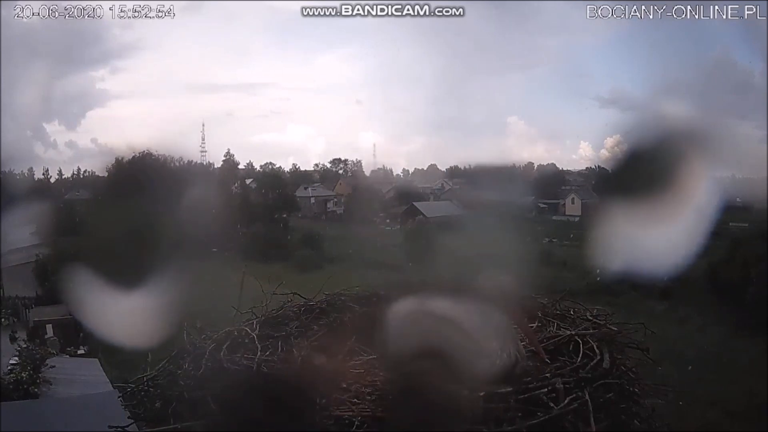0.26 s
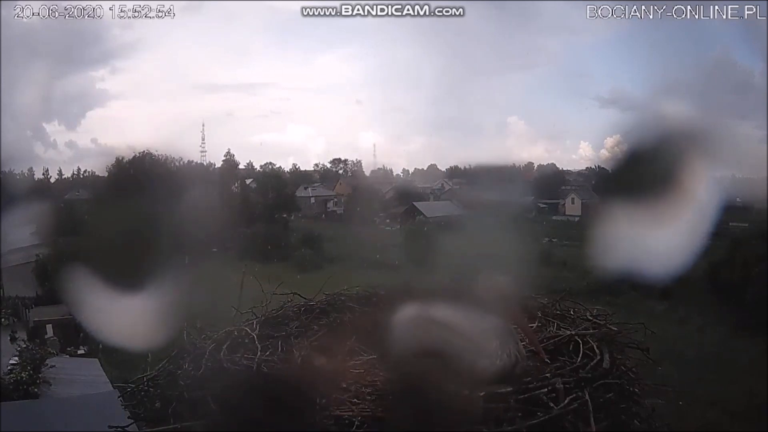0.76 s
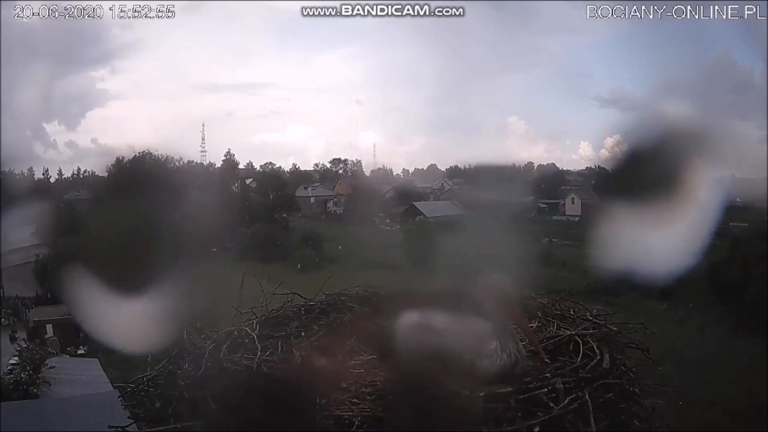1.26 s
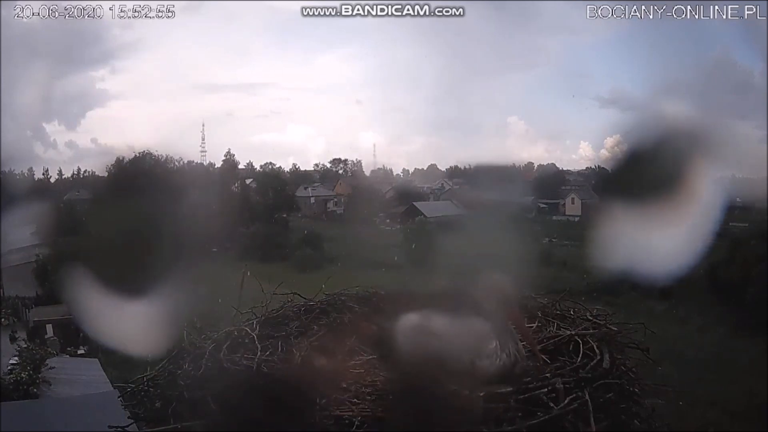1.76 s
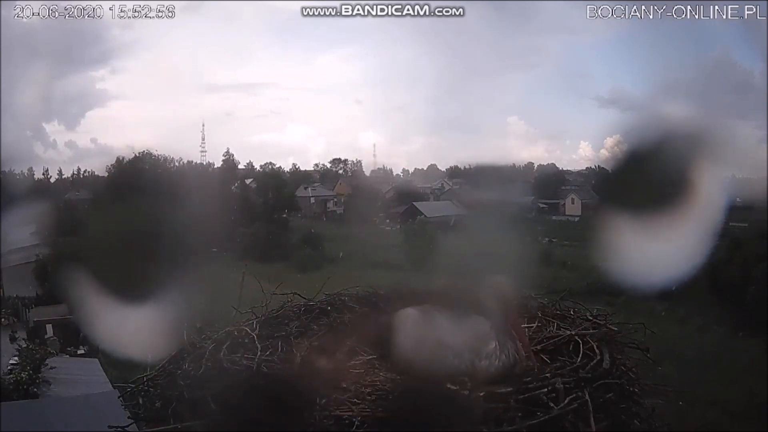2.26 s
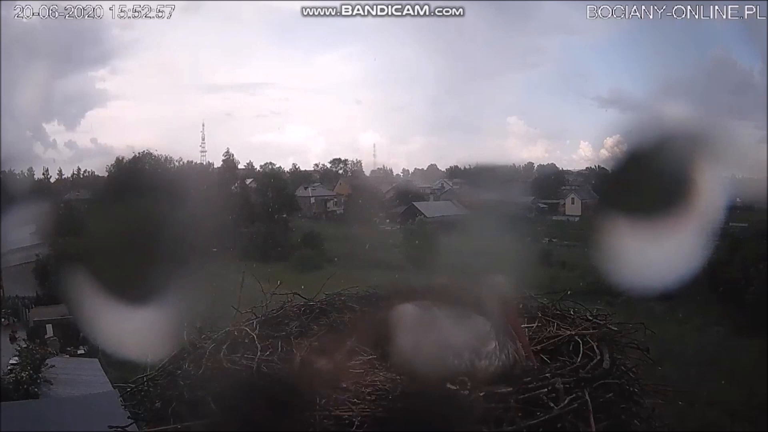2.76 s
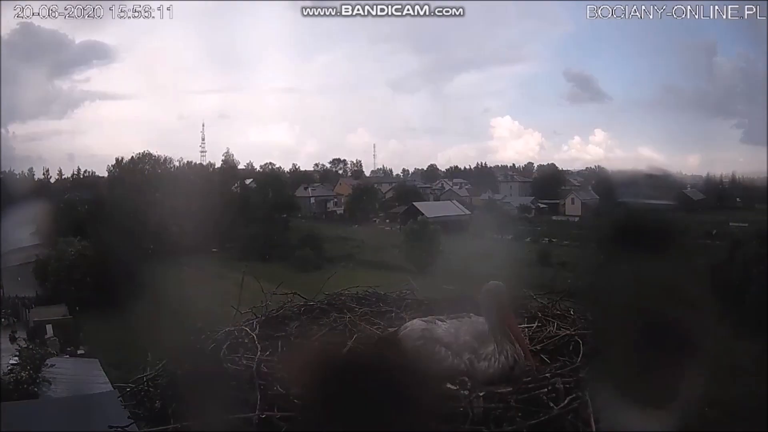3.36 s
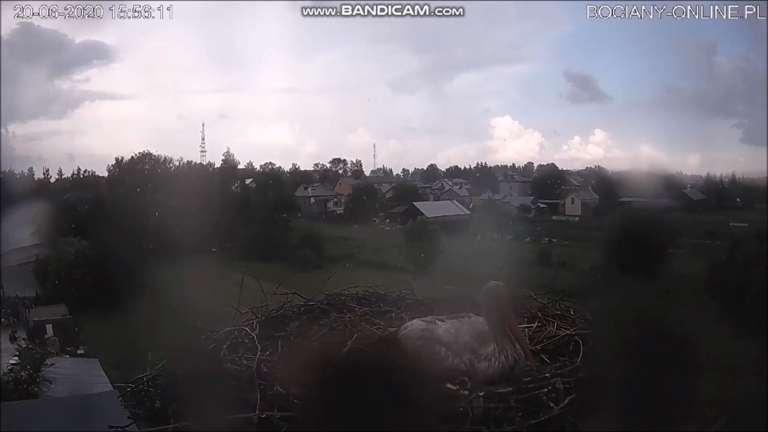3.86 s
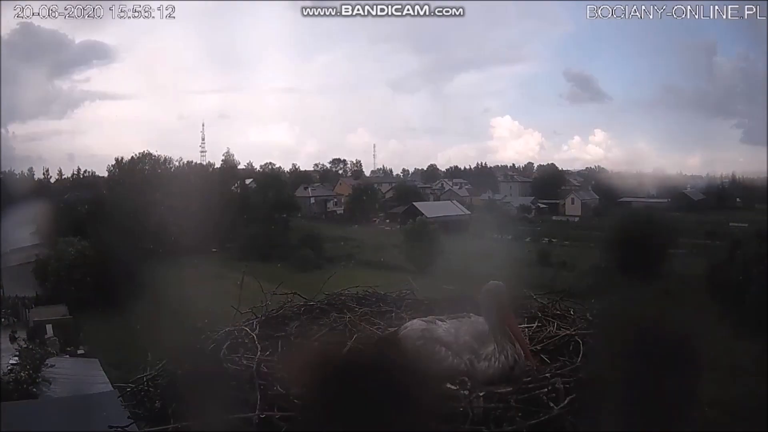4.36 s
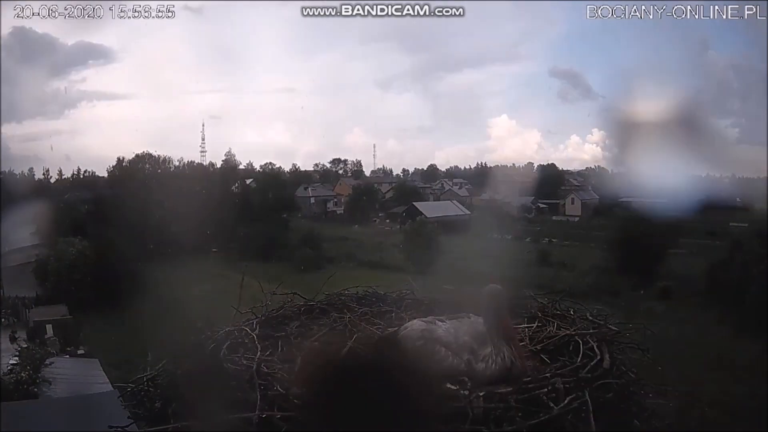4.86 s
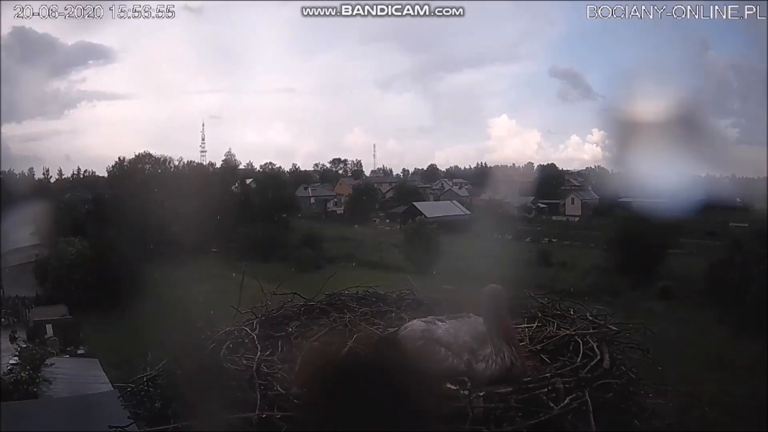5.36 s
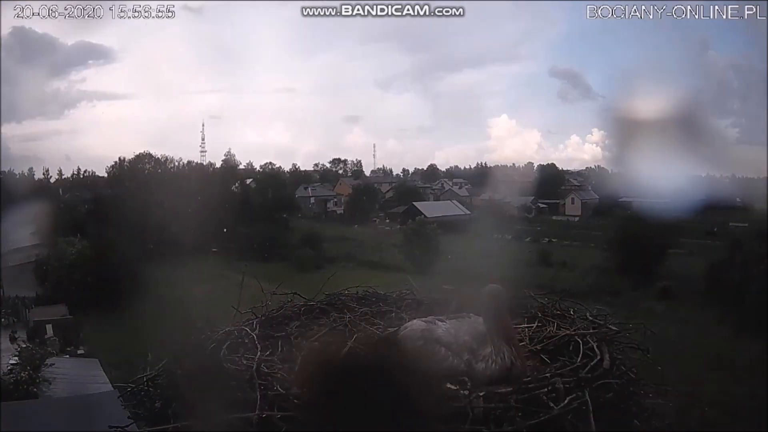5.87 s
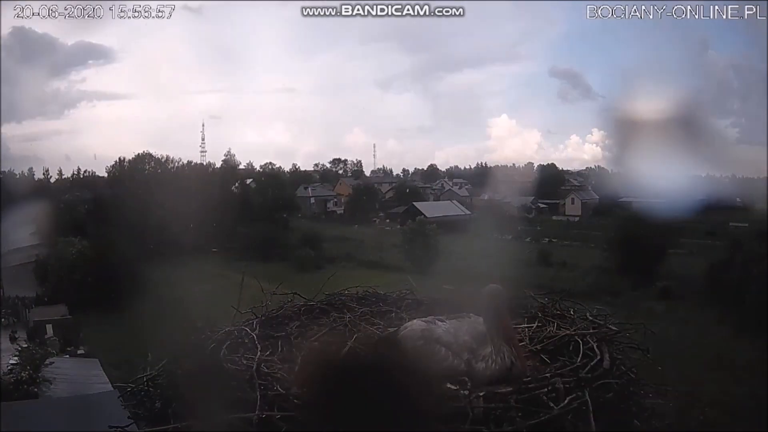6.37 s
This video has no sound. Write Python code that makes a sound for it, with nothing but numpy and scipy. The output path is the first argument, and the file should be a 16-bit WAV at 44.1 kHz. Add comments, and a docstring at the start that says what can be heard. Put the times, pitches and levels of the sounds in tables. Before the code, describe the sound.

Drops tap near the microphone as steady rain and far rumbles cut out briefly, returning softer before nearby thunder cracks sharply.

```python
"""Gardens in a thunderstorm, heard in mono from inside the housing of an outdoor camera. Heavy rain hisses on
leaves and roofs over far thunder, then the sound drops out for a moment. Lighter rain follows, and a close peal
cracks twice and rolls away: shock waves from a long, crooked lightning channel. Single drops tap on the housing
and tick on the twigs around it."""
import sys
import numpy as np
from scipy import signal
from scipy.fft import rfft, irfft
from scipy.io import wavfile

SR = 44100
rng = np.random.default_rng(int(sys.argv[2]) if len(sys.argv) > 2 else 0)


def dump_mix(stems):
    """Bounce the given channels to the path in sys.argv[1] as a 16-bit WAV at rate SR."""
    frames = np.atleast_2d(stems).T  # one column per channel
    limited = np.clip(frames, -1, 1)  # hard clip at full scale
    pcm = np.round(limited * 32767).astype(np.int16)
    wavfile.write(sys.argv[1], SR, pcm)


N = 291501
TIME = np.arange(N) / SR
HEAVY_RAIN_END_S, LIGHT_RAIN_START_S, PEAL_START_S = 3.134, 3.2, 4.867

# The tone of close thunder, for its roll and its claps. Each row: frequency in Hz, gain in dB.
PEAL_COLOUR = [(30, -83), (70, -36), (110, -17), (190, -1.5), (340, -1), (650, -4.5), (900, -4.5),
               (1250, -1), (1700, -5.5), (2400, -13.5), (3200, -21), (5000, -30), (9000, -39)]


def peal(bed_db=-37, fade_db_per_s=3.5, rasp_db=7.0, rasp_s=0.21):
    """Close thunder starts at once and dies away; its first waves, from the nearest channel, rasp."""
    # Swells of the close roll. Each row: crest in seconds, level in dB, fade time in seconds.
    swells = [(5.03, -33.5, 0.023), (5.18, -30, 0.088), (5.355, -34.5, 0.14), (5.65, -38.5, 0.11),
              (5.965, -36, 0.037), (6.24, -41, 0.18)]
    body = roll(PEAL_COLOUR, grain_db=-1.5, throb_db=-0.5)
    age = np.maximum(TIME - PEAL_START_S, 0)
    rasping = boost(body, hz=2350, width_hz=1200, db=rasp_db * np.exp(-age / rasp_s))
    loudness = surges(swells, bed_db - fade_db_per_s * age, rise_share=1)
    return (TIME >= PEAL_START_S) * loudness * rasping


def claps(steep_hz=4000, snap_db=-2.5, snap_share=0.3, crackle_db=-20, crackle_s=0.01):
    """Stretches of lightning that lie side-on arrive all at once: a sharp front with a short wake."""
    # Shock fronts that stand out of the roll. Each row: start in seconds, level in dB,
    # fade time in seconds, low-pass cutoff in Hz, thump boost in dB.
    fronts = [(0.152, -28, 0.0032, 1400, 10), (0.192, -33, 0.007, 496, 5), (1.618, -34, 0.016, 650, 6),
              (4.263, -47.5, 0.045, 900, -4), (4.425, -44.5, 0.0099, 500, 13),
              (4.869, -31, 0.0082, 3000, 5), (4.9, -37, 0.016, 500, 10), (5.063, -20.5, 0.016, 6000, 5),
              (5.068, -20, 0.0033, 450, 5), (5.0715, -28, 0.0069, 4500, 6), (5.079, -23.5, 0.01, 5000, 6),
              (5.086, -35, 0.0096, 4500, -2), (5.1015, -31.5, 0.014, 4500, 5),
              (5.124, -27, 0.016, 2400, -2), (5.131, -25.5, 0.024, 5000, -2),
              (5.1385, -24, 0.0037, 5000, -1), (5.143, -23, 0.0046, 5000, 3), (5.1495, -18, 0.014, 5100, 0),
              (5.159, -23, 0.014, 4500, 12), (5.175, -27, 0.0068, 4500, 8), (5.243, -33, 0.0088, 500, 6),
              (5.326, -31, 0.029, 500, 10), (5.37, -32, 0.012, 1900, 0), (5.551, -32.5, 0.02, 550, 10),
              (5.582, -34.5, 0.037, 2400, -19), (5.64, -27.5, 0.0064, 2200, -9),
              (5.66, -36, 0.013, 2400, -16), (5.682, -30.5, 0.018, 1900, -3), (5.757, -39, 0.012, 1500, -2),
              (5.893, -37, 0.008, 2400, -11), (6.056, -27, 0.0034, 2200, -14), (6.079, -34, 0.008, 600, -4),
              (6.196, -28.5, 0.0085, 1800, 1), (6.243, -34, 0.016, 550, 14), (6.272, -26, 0.01, 1800, 6),
              (6.304, -36.5, 0.0095, 500, 3), (6.590, -29.5, 0.017, 1800, 2.5)]
    # The bright tone of a snap. Each row: frequency in Hz, gain in dB.
    snap_colour = [(100, -18), (500, 17), (2000, 2), (4000, -5.5), (6500, -4), (10000, -8.5), (16000, -15)]
    out, wakes = np.zeros(N), np.zeros(N)
    for start, db, fade_s, top_hz, thump_db in fronts:
        front = shock_burst(PEAL_COLOUR, fade_s, lead_db=-7)
        thumping = boost(front, hz=310, width_hz=280, db=thump_db)
        add(out, start, undb(db) * np.std(front) * unit(cut(thumping, top_hz, "low")))
        if top_hz > steep_hz:  # the steepest fronts snap through the treble, and their wake crackles
            snap = shock_burst(snap_colour, snap_share * fade_s, lead_db=-8)
            add(out, start, undb(db + snap_db) * snap)
            add(wakes, start, undb(db) * np.exp(-TIME / crackle_s))
    crackle = unit(colour(impacts(rate=600, spread_db=3, limit_db=6), snap_colour))
    return out + undb(crackle_db) * wakes * crackle


def shock_burst(tone, fade_s, lead_db, size=8192):
    """One leading shock, then a fading bundle of smaller ones."""
    envelope = np.exp(-np.arange(size) / SR / fade_s)
    wake = unit(rng.standard_normal(size) * envelope)
    lead = undb(lead_db) * unit(signal.unit_impulse(size))
    return unit(colour(lead + wake, tone)) * np.sqrt(np.mean(envelope ** 2))


def roll(tone, grain_db, throb_db):
    """Scattered shock waves from a long crooked channel, dulled by the air, arrive in clumps."""
    shocks = rng.standard_normal(N) + undb(grain_db) * impacts(rate=500, spread_db=-3.0, limit_db=1.5)
    return unit(colour(shocks, tone)) * undb(throb_db * drift(35))


def surges(swells, bed_db, rise_share):
    """Loudness of a roll: each bend of the channel sends a swell, whose power adds to a bed."""
    power = undb(bed_db) ** 2
    for crest_s, db, fade_s in swells:
        rise_s = rise_share * fade_s
        from_crest = np.maximum((TIME - crest_s) / fade_s, (crest_s - TIME) / rise_s)
        power = power + (undb(db) * np.exp(-from_crest)) ** 2
    return np.sqrt(power)


def rain(patter_db=-6, spray_db=-19, flutter_db=1.0, sizzle_sway_db=2):
    """Countless far drops merge into hiss; nearer ones patter and sizzle, the nearest spray ticks."""
    # The tone of rain on leaves and roofs. Each row: frequency in Hz, gain in dB.
    wash_colour = [(100, -31.5), (250, -19), (500, -11.5), (850, -9), (1150, 0), (1600, 0.5), (2000, -2.5),
                   (3000, -5), (4500, -6.5), (6000, -11), (7100, -14), (9500, -14.5), (11500, -21.5),
                   (16000, -31)]
    # How the sizzle rides on the wash. Each row: time in seconds, relative level in dB.
    sizzle_curve = [(0, -12), (1.66, -14.5), (1.74, -5.5), (1.86, -12), (1.98, -12), (3.13, -13.5),
                    (3.6, -17), (6.6, -14.5)]
    # Each kind of twig and leaf has its own tick. Each row: pitch in Hz, level in dB.
    leaves = [(4700, 1), (5900, -0.5), (7800, 3.5), (9500, 1.5), (12000, -15)]
    hiss = rng.standard_normal(N) * undb(flutter_db * drift(9.2))
    patter = impacts(rate=1400, spread_db=6.5, limit_db=12.5)
    wash = unit(colour(hiss + undb(patter_db) * patter, wash_colour))
    pings = ring_twice(impacts(rate=1200, spread_db=7.0, limit_db=16.5), hz=3560, width_hz=600)
    sizzle_db = np.interp(TIME, *np.transpose(sizzle_curve)) + sizzle_sway_db * drift(7.9)
    spray = np.zeros(N)
    for hz, db in leaves:
        hits = impacts(rate=22, spread_db=3.5, limit_db=6.5)
        spray += undb(db) * ring_twice(hits, hz, width_hz=2200)
    return rain_strength() * (wash + undb(sizzle_db) * unit(pings) + undb(spray_db) * unit(spray))


def rain_strength(heavy_db=-42, flurry_db=0.5, flurry_s=0.99, light_db=-50, pickup_db_per_s=0.54):
    """The heavy rain settles after a slight flurry; the lighter rain slowly picks up."""
    heavy = heavy_db + flurry_db * np.exp(-TIME / flurry_s)
    light = light_db + pickup_db_per_s * (TIME - LIGHT_RAIN_START_S)
    return undb(np.where(TIME < LIGHT_RAIN_START_S, heavy, light))


def housing_drops(tick_s=0.00072, click_db=-14):
    """A drop ticks on the housing, then its body lands with a lower slap and a hollow plop."""
    # Drops on the housing. Each row: start in seconds, tick level in dB, tick pitch in Hz,
    # slap delay in seconds, slap level in dB, slap pitch in Hz, slap fade time in seconds,
    # low-pass cutoff in Hz, plop level in dB.
    drops = [(0.2323, -10.5, 6830, 0.0003, -18, 2340, 0.0014, 15000, -48),
             (0.5651, -29, 5200, 0.0021, -22.5, 2000, 0.0031, 13000, -34),
             (1.298, -26, 5400, 0.0014, -25.5, 1450, 0.001, 11000, -54),
             (2.7701, -18, 3880, 0.0026, -18, 1400, 0.00068, 14500, -45),
             (2.9211, -25, 2400, 0.0031, -21.5, 1450, 0.0016, 13000, -25),
             (3.3332, -27.5, 3400, 0.0002, -39, 2270, 0.0008, 7000, -50),
             (5.9762, -30, 4300, 0.00063, -30, 1200, 0.0016, 8000, -36),
             (6.1892, -31, 5000, 0.0005, -33.5, 1150, 0.0016, 13000, -40)]
    # Resonances of the housing wall. Each row: pitch in Hz, bandwidth in Hz, level in dB.
    wall_modes = [(327, 92, -8), (600, 71, -7), (1220, 540, 2.5), (2770, 170, 0), (4100, 1200, -5),
                  (6270, 390, -5.5), (9910, 120, 5), (11800, 600, -12), (14200, 800, -9)]

    def strike(fade_s, hz, top_hz, width_share, splash_db, wall_db):
        """A push rings the spot that it hits and the wall around it."""
        push = cut(drop_push(fade_s, splash_db), top_hz, "low")
        spot = ring(push, hz, width_share * hz)
        wall = ring_modes(push, wall_modes)
        return with_tone_energy(spot + undb(wall_db) * wall + undb(click_db) * push, fade_s)

    hollow = ring_twice(signal.unit_impulse(1024), hz=600, width_hz=320)
    plop = with_tone_energy(hollow, fade_s=0.0015)
    out = np.zeros(N)
    for start, tick_db, tick_hz, lag_s, slap_db, slap_hz, slap_s, top_hz, plop_db in drops:
        tick = strike(tick_s, tick_hz, top_hz, width_share=0.29, splash_db=-13, wall_db=-4)
        slap = strike(slap_s, slap_hz, top_hz, width_share=0.31, splash_db=-11, wall_db=-3)
        add(out, start, undb(tick_db) * tick)
        add(out, start + lag_s, undb(slap_db) * slap + undb(plop_db) * plop)
    return cut(out, 180, "high")


def twig_ticks(fade_s=0.0011, splash_db=-14, click_db=-23):
    """A drop on a twig gives one tick that rings very briefly at the twig's own pitch."""
    # Drops on nearby twigs. Each row: start in seconds, level in dB, pitch in Hz, bandwidth in Hz.
    ticks = [(0.0294, -35, 9000, 5000), (0.047, -34, 7400, 1000), (0.0888, -29, 7500, 5000),
             (0.112, -29, 5130, 1000), (0.2188, -27, 7500, 6000), (0.277, -35, 5700, 900),
             (0.683, -46, 12000, 5000), (0.789, -38, 10000, 5000), (0.845, -29, 4930, 1800),
             (0.961, -33.5, 8500, 5000), (1.03, -35, 6500, 2000), (1.137, -36, 9500, 2500),
             (1.207, -34, 6000, 2500), (1.344, -33, 7000, 3000), (1.603, -31.5, 6000, 3000),
             (2.176, -37, 9500, 2000), (2.248, -36, 7500, 4000), (2.295, -35, 9000, 5000),
             (2.359, -36, 6000, 2000), (2.4372, -29, 5170, 4000), (2.52, -34, 5800, 3000),
             (2.739, -36, 7000, 2500), (2.819, -50, 5500, 2500), (3.083, -34, 7950, 6000),
             (3.107, -32.5, 7500, 3000), (3.494, -42, 12900, 2980), (3.831, -39, 5200, 2500),
             (4.02, -48, 10000, 5000), (4.151, -43, 6460, 1800), (4.23, -49, 14100, 2500),
             (4.332, -50, 11200, 3000), (4.5445, -43, 7000, 3000), (4.595, -35.5, 5600, 3000),
             (4.686, -35.5, 8000, 4000), (4.751, -38, 7500, 3500), (5.329, -43, 7000, 3500),
             (5.611, -41, 7500, 3000), (5.667, -41, 12500, 2500), (5.896, -36, 8700, 2500),
             (6.039, -49, 13000, 3000), (6.189, -24.5, 4700, 2400), (6.346, -32.5, 5730, 1000),
             (6.456, -38, 9000, 1600)]
    out = np.zeros(N)
    for start, db, hz, width_hz in ticks:
        push = drop_push(fade_s, splash_db)
        tick = ring_twice(push, hz, width_hz) + undb(click_db) * push
        add(out, start, undb(db) * with_tone_energy(tick, fade_s))
    return out


def far_thunder(first_top_hz=1500, second_top_hz=500):
    """Two distant rolls over a faint steady rumble; the second has come further, so it is duller."""
    # The dark tone of far thunder. Each row: frequency in Hz, gain in dB.
    far_colour = [(30, -35), (70, -38), (110, -12), (190, 1), (320, 0.5), (500, -3), (750, -5.5),
                  (1200, -9), (2500, -47.5)]
    # Swells of the far rolls. Each row: crest in seconds, level in dB, fade time in seconds.
    swells = [(0.01, -45, 0.031), (0.24, -46, 0.24), (0.52, -50.5, 0.16), (1.36, -47, 0.27),
              (1.52, -47.5, 0.1), (1.65, -41.5, 0.11), (1.92, -49, 0.43), (3.42, -53.5, 0.44),
              (3.9, -51.5, 1), (4.48, -46.5, 0.1), (4.66, -47, 0.1)]
    rumble = roll(far_colour, grain_db=-7.5, throb_db=2.5)
    first, second = cut(rumble, first_top_hz, "low"), cut(rumble, second_top_hz, "low")
    loudness = surges(swells, bed_db=-59.5, rise_share=0.75)
    return loudness * np.where(TIME < LIGHT_RAIN_START_S, first, second)


def mount_ring(fronts):
    """The camera's mount rings when a clap shakes it."""
    # Narrow resonances of the mount. Each row: pitch in Hz, bandwidth in Hz, level in dB.
    mount_modes = [(388, 12, 2.5), (533, 14, -6), (770, 10, -2), (1007, 12, -1), (1141, 14, -1),
                   (1507, 12, 6), (1845, 14, 0)]
    return ring_modes(fronts, mount_modes)


def housing(x):
    """The hollow of the housing colours whatever reaches the microphone."""
    # Cavity resonances. Each row: centre in Hz, bandwidth in Hz, boost in dB.
    cavity_modes = [(330, 21, 2), (1140, 31, 2), (1506, 340, 2.5), (2400, 540, 4), (3610, 830, 4),
                    (5440, 1040, 4.5), (7990, 530, 3), (13150, 1200, 3.5)]
    for hz, width_hz, db in cavity_modes:
        x = boost(x, hz, width_hz, db)
    return x


def drop_push(fade_s, splash_db, size=1024):
    """The push of a drop: one sharp touch, then a splash that fades."""
    t = np.arange(size) / SR
    return (t == 0) + undb(splash_db) * rng.standard_normal(size) * np.exp(-t / fade_s)


def impacts(rate, spread_db, limit_db):
    """Random clicks of uneven size, about rate per second; rms 1."""
    size = undb(np.minimum(spread_db * rng.exponential(size=N), limit_db))
    hits = rng.random(N) < rate / SR
    return unit(hits * size * rng.choice([-1, 1], N))


def drift(rate):
    """A random wander with a spread near 1, turning rate times a second."""
    knots = rng.standard_normal(1024)
    return np.interp(TIME * rate, np.arange(len(knots)), knots)


def colour(x, points, size=4096):
    """A minimum-phase equaliser through points of frequency in Hz and gain in dB."""
    hz, db = np.transpose(points)
    bins = np.maximum(np.fft.rfftfreq(size, 1 / SR), 1)
    gain = undb(np.interp(np.log(bins), np.log(hz), db))
    cepstrum = irfft(np.log(gain))
    cepstrum[1:size // 2] *= 2  # folded forward, so nothing rings ahead of an attack
    cepstrum[size // 2 + 1:] = 0
    response = irfft(np.exp(rfft(cepstrum)))
    return signal.fftconvolve(x, response)[:len(x)]


def ring(x, hz, width_hz):
    """One resonance, gain 1 at its centre."""
    q = hz / min(width_hz, SR / np.pi)
    return signal.lfilter(*signal.iirpeak(min(hz, SR / 2 - 1), q, fs=SR), x)


def ring_twice(x, hz, width_hz):
    """The same resonance twice in series, for steeper skirts."""
    return ring(ring(x, hz, width_hz), hz, width_hz)


def ring_modes(x, modes):
    """Several resonances sounding side by side."""
    return sum(undb(db) * ring(x, hz, width_hz) for hz, width_hz, db in modes)


def boost(x, hz, width_hz, db):
    """Lift one band, or dip it if db is negative."""
    return x + (undb(db) - 1) * ring(x, hz, width_hz)


def cut(x, hz, kind):
    """Second-order low-pass or high-pass."""
    return signal.sosfilt(signal.butter(2, min(hz, SR / 2 - 1), kind, fs=SR, output="sos"), x)


def with_tone_energy(x, fade_s):
    """Give a short sound the energy of a unit tone that fades in fade_s."""
    return x * np.sqrt(fade_s * SR / 4 / np.sum(x ** 2))


def add(track, start, sound):
    """Mix a sound into a track at a start time in seconds."""
    part = track[int(start * SR):][:len(sound)]
    part += sound[:len(part)]


def undb(db):
    """Decibels to gain."""
    return 10 ** (np.asarray(db) / 20)


def unit(x):
    """Scale to rms 1."""
    return x / np.sqrt(np.mean(x ** 2))


def scene():
    """Thunder, rain and single drops, heard through the housing, the same in both channels."""
    fronts = claps()
    thunder = far_thunder() + peal() + fronts + mount_ring(fronts)
    heard = housing(thunder + rain() + housing_drops() + twig_ticks())
    return np.array([heard, heard])


def record(dry, ceiling=0.3, bass_hz=62, top_hz=15700):
    """The preamplifier rounds the loudest claps; the sound drops out once; bass and top are trimmed."""
    rounded = ceiling * np.tanh(dry / ceiling)
    audible = (TIME < HEAVY_RAIN_END_S) | (TIME >= LIGHT_RAIN_START_S)
    thinned = cut(audible * rounded, bass_hz, "high")
    steep_low_pass = signal.ellip(10, .2, 80, top_hz, fs=SR, output="sos")
    return signal.sosfilt(steep_low_pass, thinned)


dry = scene()
out = record(dry)
dump_mix(out)
```